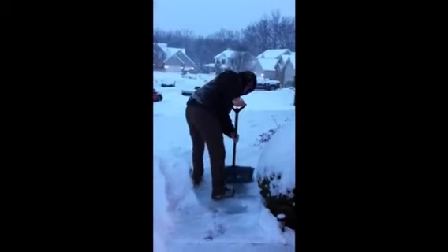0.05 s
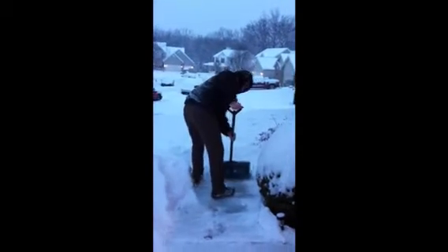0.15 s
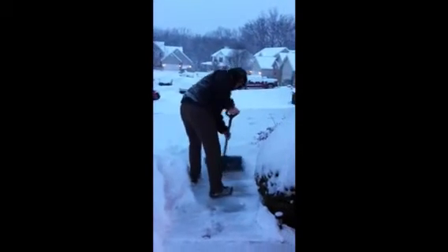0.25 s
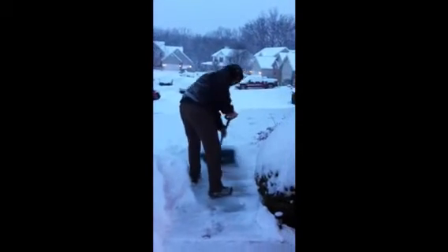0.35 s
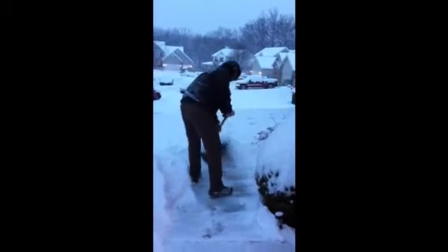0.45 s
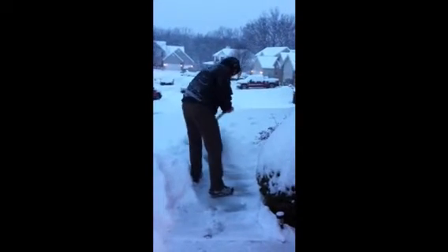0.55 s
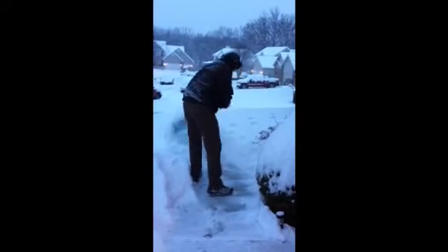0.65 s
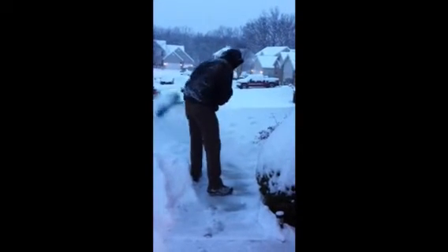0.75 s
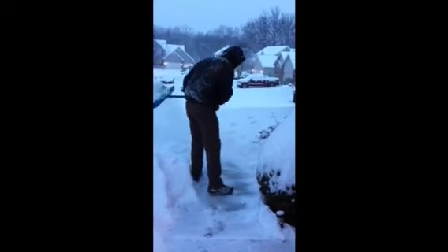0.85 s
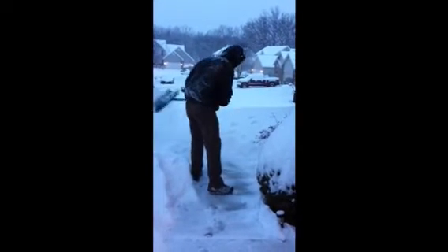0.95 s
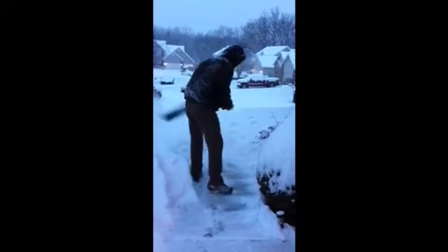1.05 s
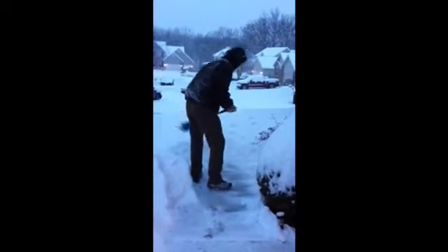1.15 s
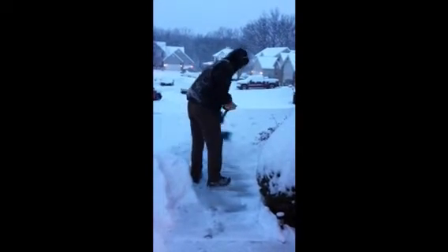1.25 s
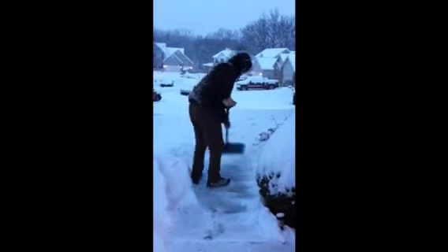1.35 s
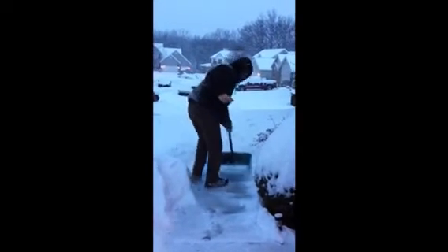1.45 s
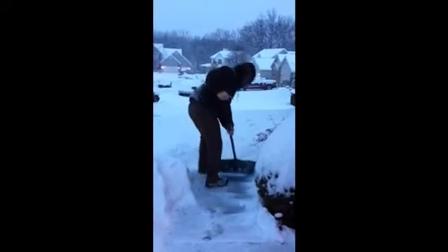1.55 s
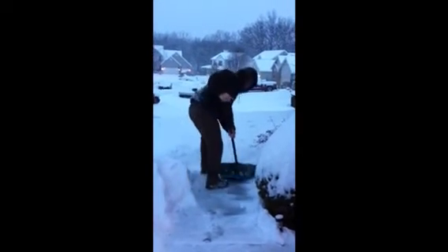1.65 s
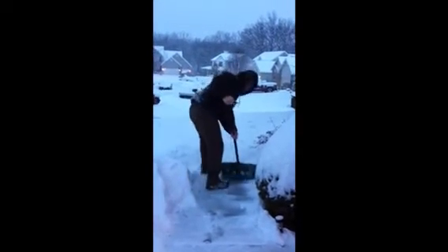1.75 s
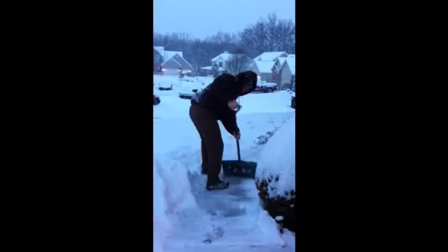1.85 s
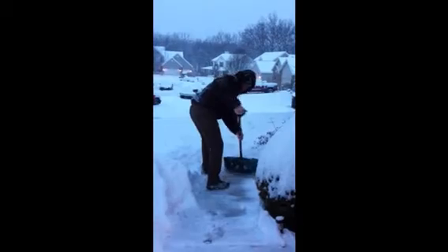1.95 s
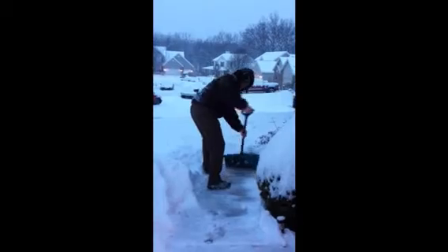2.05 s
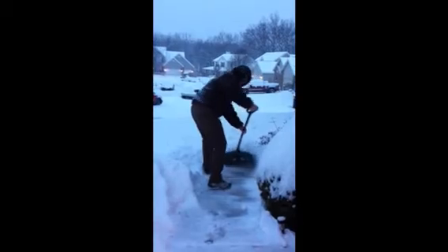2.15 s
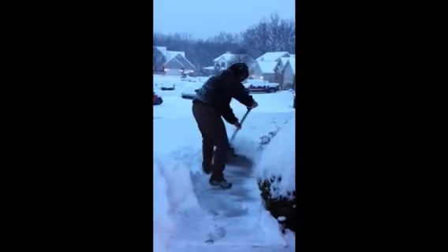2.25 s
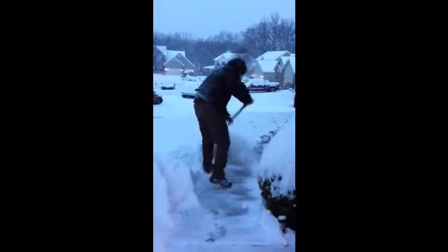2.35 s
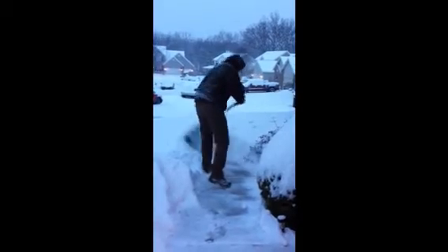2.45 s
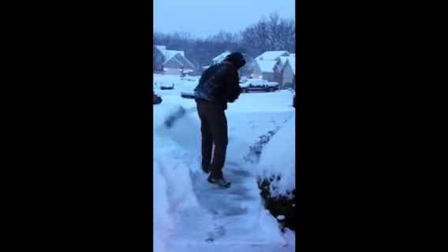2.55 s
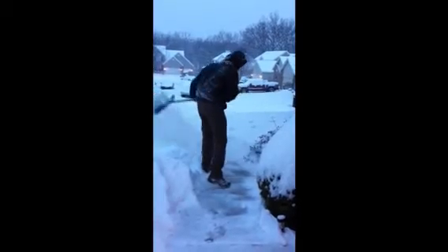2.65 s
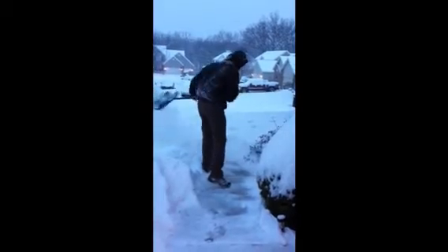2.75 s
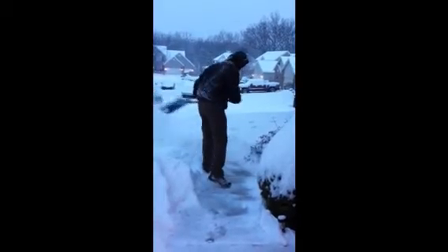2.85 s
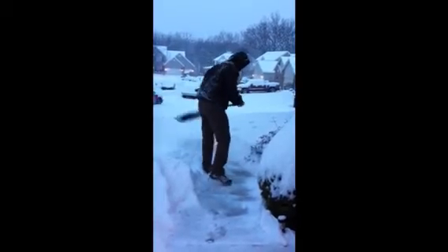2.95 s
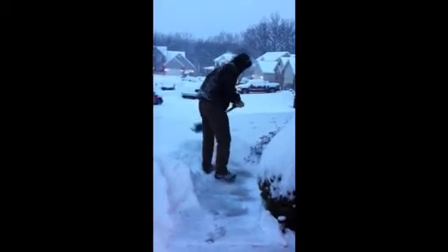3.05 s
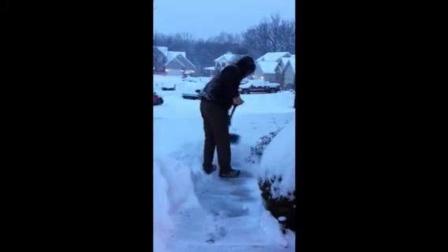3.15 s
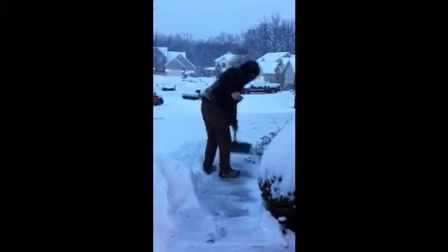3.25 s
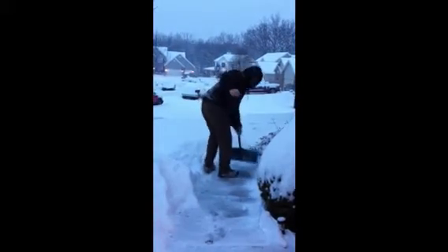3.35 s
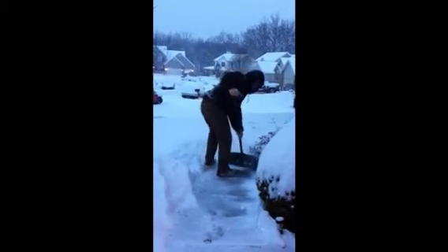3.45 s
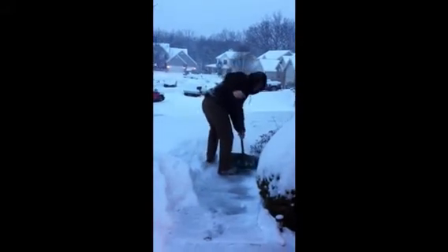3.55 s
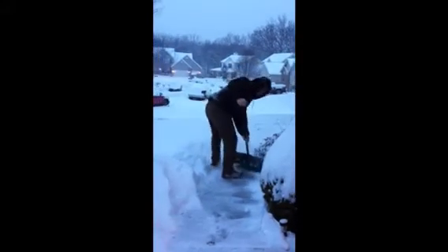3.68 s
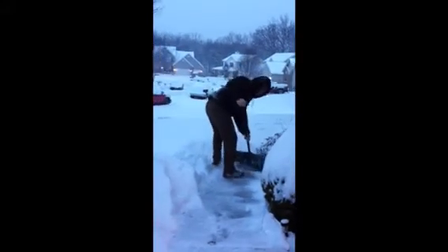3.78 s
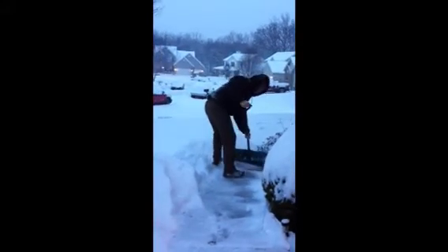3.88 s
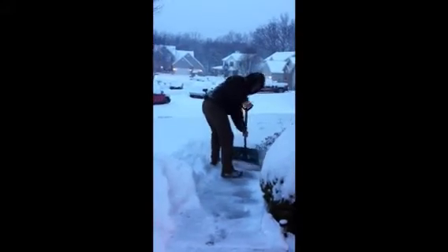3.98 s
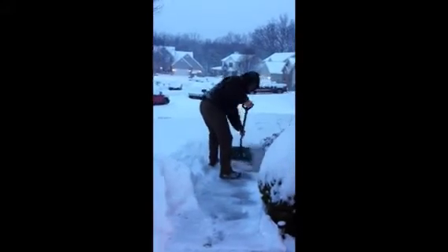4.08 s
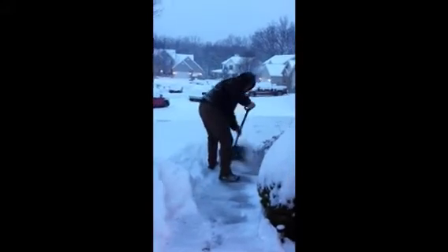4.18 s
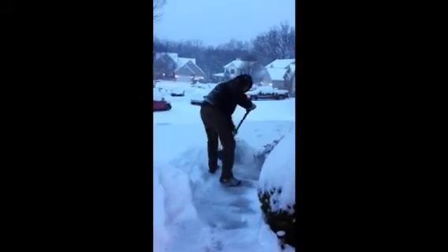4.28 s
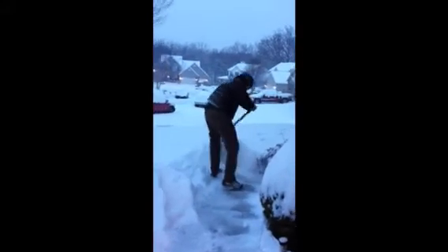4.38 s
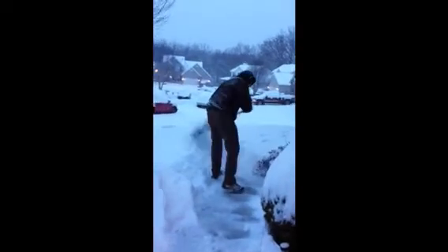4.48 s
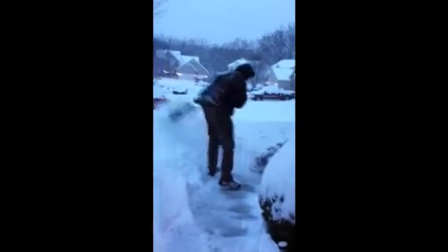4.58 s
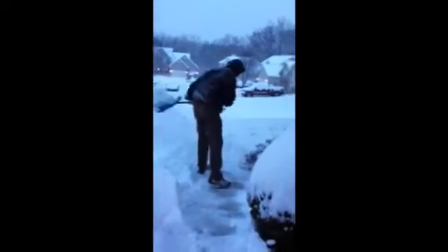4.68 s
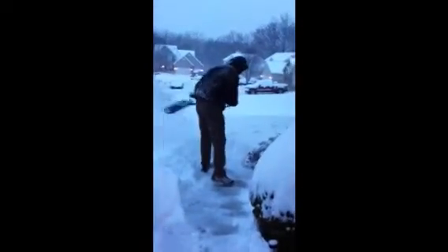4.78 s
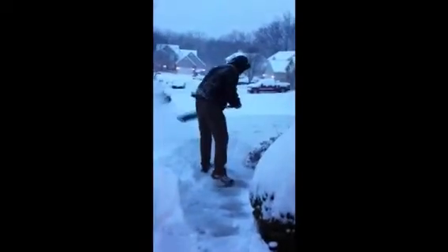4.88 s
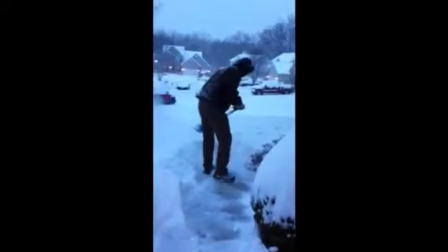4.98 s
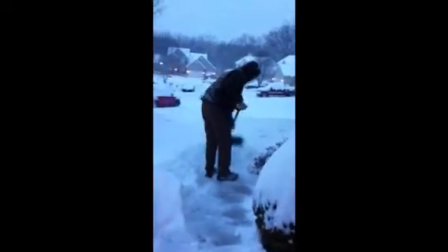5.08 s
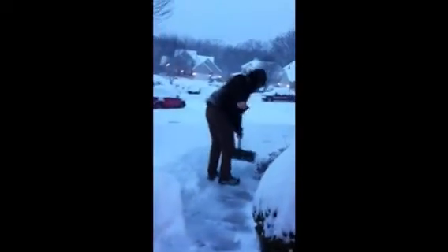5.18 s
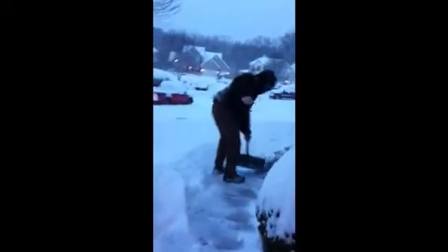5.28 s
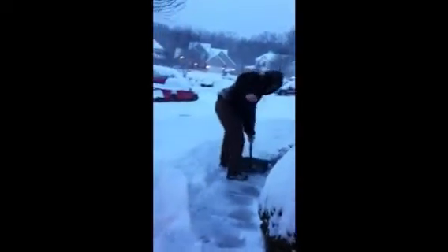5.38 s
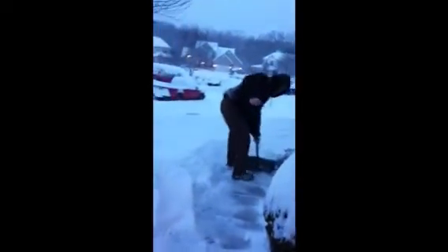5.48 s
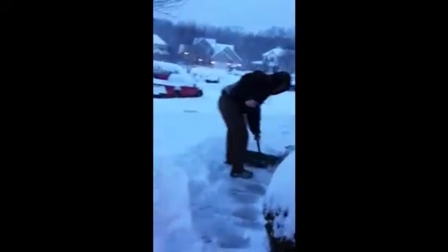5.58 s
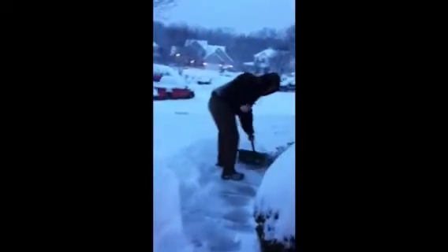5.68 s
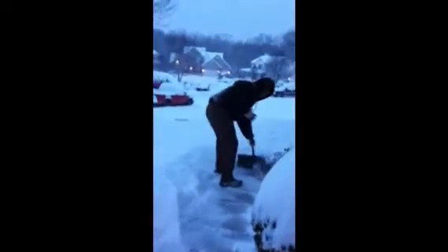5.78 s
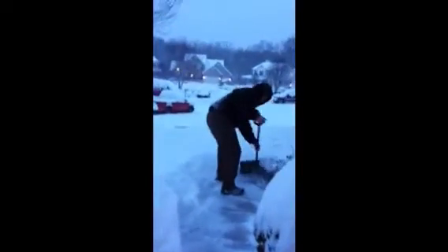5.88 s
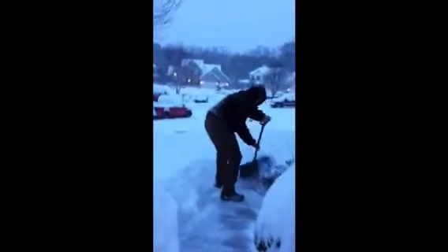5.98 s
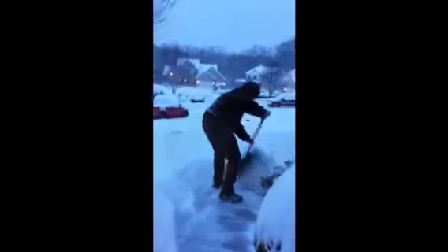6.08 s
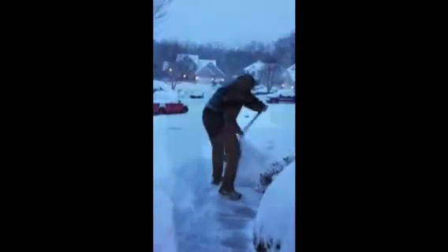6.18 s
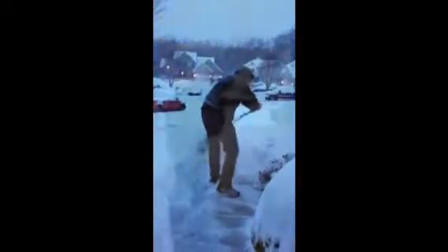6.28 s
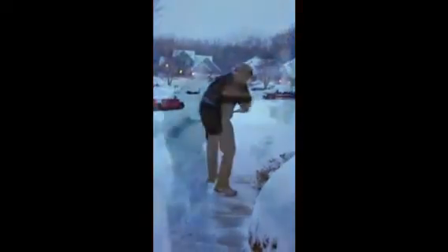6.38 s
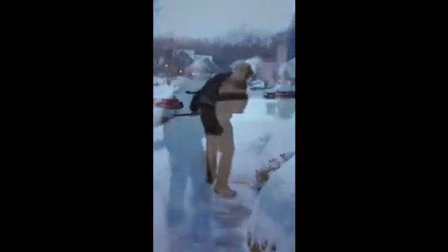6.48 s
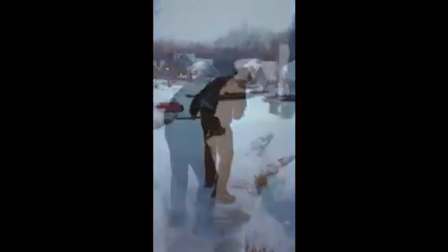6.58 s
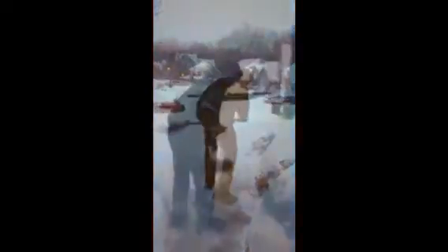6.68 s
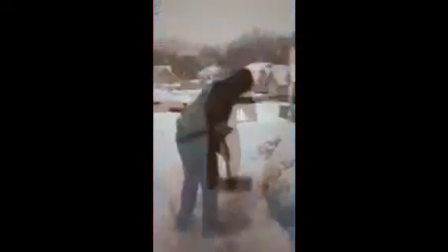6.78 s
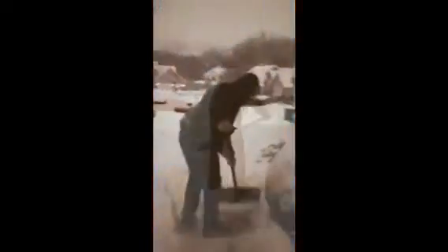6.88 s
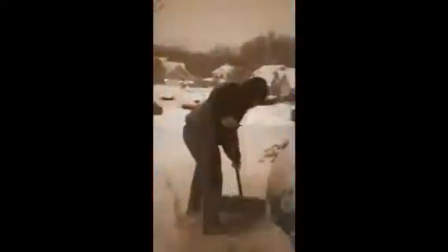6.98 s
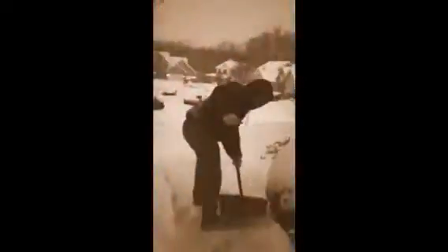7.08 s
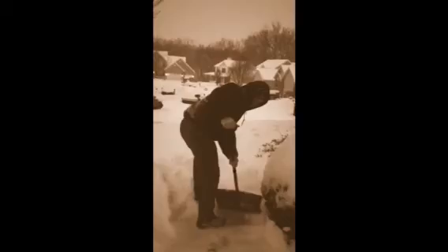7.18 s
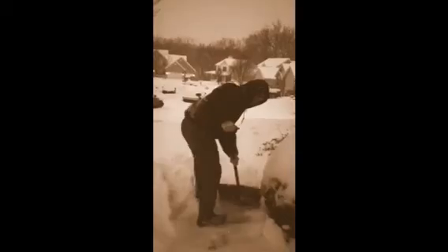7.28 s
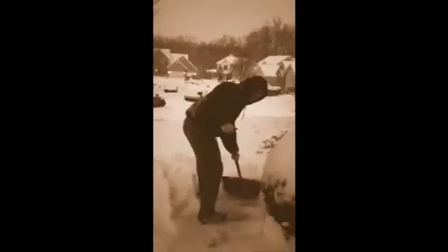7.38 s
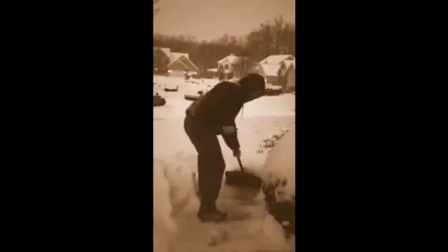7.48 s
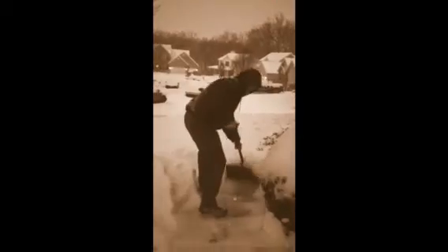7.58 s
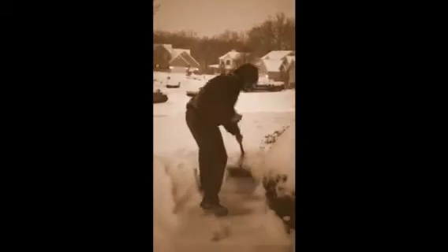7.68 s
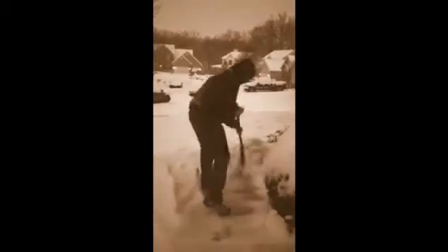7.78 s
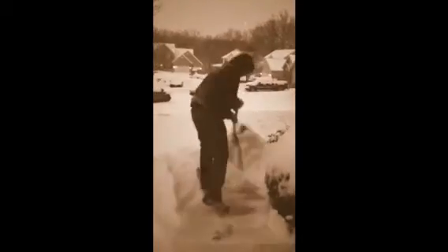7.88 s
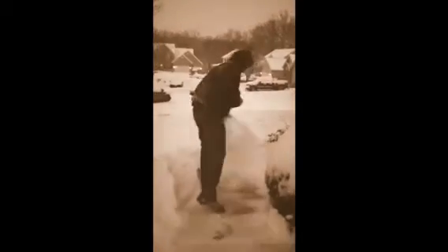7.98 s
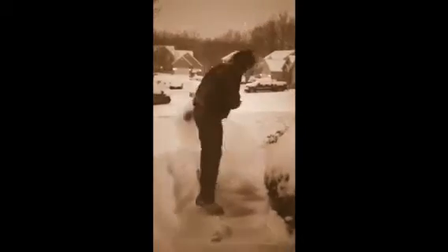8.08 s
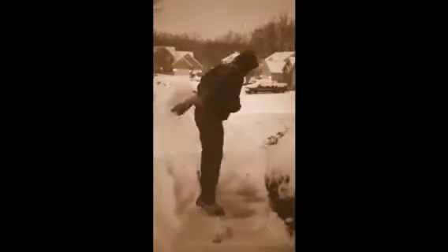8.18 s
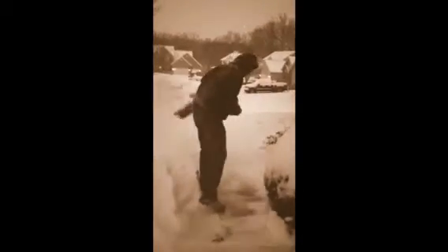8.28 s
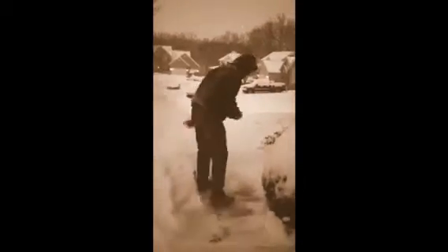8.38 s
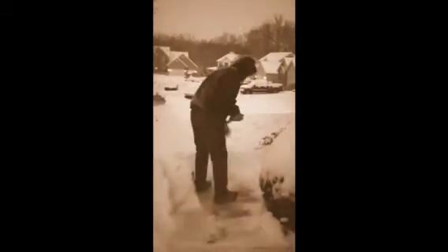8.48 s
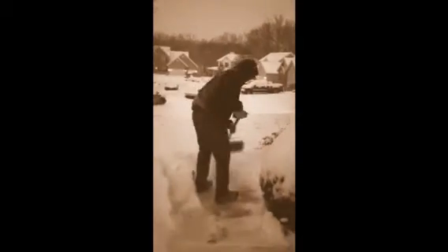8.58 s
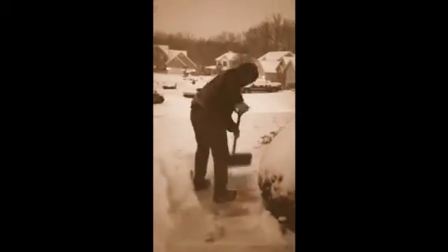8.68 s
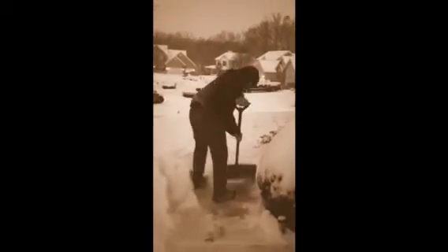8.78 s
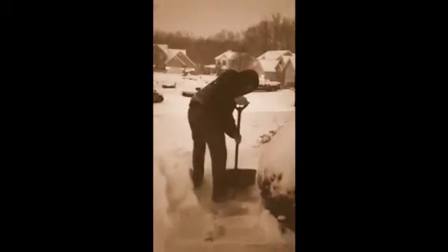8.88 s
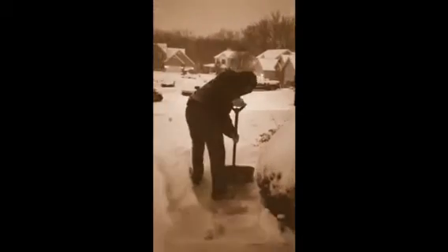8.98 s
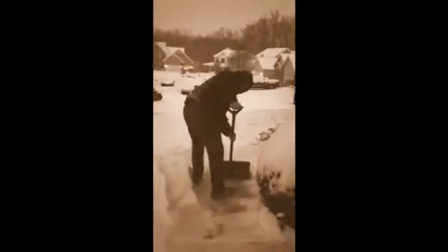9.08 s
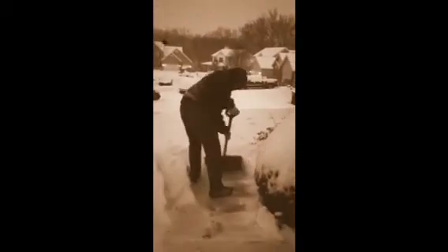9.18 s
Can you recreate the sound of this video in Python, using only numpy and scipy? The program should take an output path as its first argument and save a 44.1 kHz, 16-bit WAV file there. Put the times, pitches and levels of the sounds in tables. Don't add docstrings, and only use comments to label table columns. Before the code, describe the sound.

A few steps away, a plastic snow shovel thumps onto a concrete walk and grinds forward in a rough, bright scrape lasting under half a second. Further strokes follow about every two seconds, with stony cracks and hollow scoop knocks. Between them come light handle taps, faint sleeve swishes and soft patters of thrown snow. Quiet outdoor air, distant traffic hum and smooth microphone hiss continue throughout.

```python
import sys
import numpy as np
from scipy import signal
from scipy.fft import rfft, irfft, next_fast_len
from scipy.io import wavfile
from scipy.ndimage import uniform_filter1d, map_coordinates

SR = 44100
rng = np.random.default_rng(int(sys.argv[2]) if len(sys.argv) > 2 else 0)


def generate_wav(signal):
    frames = np.transpose(np.atleast_2d(signal))
    scaled = np.clip(frames, -1, 1) * 32767
    pcm = np.round(scaled).astype(np.int16)
    wavfile.write(sys.argv[1], SR, pcm)


def ratio_of_db(decibels):
    return 10 ** (np.asarray(decibels, float) / 20)


N = 407484


def unit(x):
    return x / np.sqrt(np.mean(x ** 2) + 1e-20)


def curves(rows):
    s, *cols = np.transpose(rows)
    return [np.interp(np.arange(N) / SR, s, c) for c in cols]


def wobble(rate):
    points = rng.standard_normal(int(N * rate / SR) + 4)
    return map_coordinates(points, [np.arange(N) * rate / SR])


def filtered(x, response):
    m = next_fast_len(N + SR // 2)
    return irfft(rfft(x, m) * response(np.fft.rfftfreq(m, 1 / SR)), m)[:N]


def ring(x, modes):
    def response(f):
        h = 0
        for k, (centre, width, db) in enumerate(modes):
            h = h + (-1) ** k * ratio_of_db(db) * 1j * f * width / (centre * centre - f * f + 1j * f * width)
        return h / np.sqrt(np.mean(abs(h) ** 2))
    return filtered(x, response)


def rush(spectrum):
    f, db = np.transpose(spectrum)

    def colour(hz):
        return ratio_of_db(np.interp(np.log(hz + 1), np.log(f + 1), db))
    return unit(filtered(rng.standard_normal(N), colour))


def add(track, s, sound):
    part = track[round(s * SR):][:len(sound)]
    part += sound[:len(part)]


def smooth_field(shape, wide, long):
    field = uniform_filter1d(rng.standard_normal(shape), size=wide, axis=0)
    return uniform_filter1d(field, size=long, axis=1)


def patchy(x, depth_db, wide, long):
    z = signal.stft(x, nperseg=256)[2]
    gain = ratio_of_db(depth_db * unit(smooth_field(z.shape, wide, long)))
    return signal.istft(z * unit(gain), nperseg=256)[1][:N]


def streaks(table, size):
    out = np.zeros(N)
    for s, length, from_hz, to_hz, db in table:
        u = np.linspace(0, 1, round(length * SR))
        fuzz = unit(uniform_filter1d(rng.standard_normal((2, SR // 5)), size=size)[:, :len(u)])
        level = ratio_of_db(db + 2.5 * fuzz[0]) * np.sin(np.pi * u)
        turns = np.cumsum(from_hz + (to_hz - from_hz) * u) / SR
        add(out, s, level * np.sin(2 * np.pi * turns + 1.38 * fuzz[1]))
    return out


def shovel():
    # start in seconds,
    # length in seconds, edge hiss in dB, change over the slide in dB, load in dB.
    strokes = [(.148, 0.024, -41.5, -1.5, 5), (.169, 0.061, -36, 2, 2), (.234, 0.055, -27.5, -8, 2),
               (.291, 0.12, -32.5, -28.5, -1), (.412, 0.025, -39, -19, 6), (.439, .12, -55, -19, 4.5),
               (1.733, 0.06, -59, 10, 0), (1.812, 0.046, -36.5, -2.5, 6.5), (1.862, 0.068, -40.5, 0, 2.5),
               (1.903, 0.041, -32.5, 0.5, 2.5), (1.944, 0.057, -31, 3, -3), (2.003, 0.16, -27.5, -29, -0.5),
               (2.172, 0.11, -43.5, -38, 3), (2.355, 0.059, -62.5, -11, 8), (3.672, 0.11, -39, 1, 2),
               (3.784, 0.068, -36, -31.5, 2), (3.859, 0.039, -46.5, 3, -1), (3.893, .254, -38, -4, -4),
               (4.147, 0.17, -41, -25.5, -2.5), (5.6, 0.048, -33, -6.5, -1), (5.652, 0.16, -41, -15, 0.5),
               (5.81, 0.12, -55, -21, -4), (7.221, 0.092, -35.5, -4.5, 3.5), (7.32, 0.1, -32.5, -5.5, 5.5),
               (7.432, 0.19, -48, -8.5, 2.5)]
    # start in seconds, length in seconds,
    # edge hiss in dB, change over the slide in dB, load in dB.
    brushes = [(.108, 0.021, -61, 3, 4), (7.212, 0.0069, -49, 3, 6), (1.365, 0.048, -64, -1, 3),
               (2.288, 0.066, -54, -5.5, -5.5), (5.08, 0.11, -54, -12, 2.5), (5.19, 0.085, -60, -6.5, -2.5),
               (5.36, 0.094, -63, 8, -8), (5.45, 0.11, -67.5, 2, -7), (6.385, 0.058, -64.5, 2.5, 0),
               (6.79, 0.1, -56, -11.5, -4), (7.16, 0.057, -52.5, -23, 4), (7.595, 0.036, -60.5, -6, 14),
               (7.63, .11, -65.5, -8, 8), (7.745, 0.045, -55.5, 0, 10.5), (8.54, 0.043, -61.5, 3.5, -2)]
    # time in seconds, ribs over face in dB, spray in dB, drum in dB.
    angle = [(.2, 0.5, -1, 0.5), (.3, -2, -2, 3.5), (.45, -2.5, -4, 0), (1.75, -8.5, 3, 10.5),
             (1.88, 1, 1.5, 4), (2.0, 0, -3.5, -3), (2.18, -3.5, -3.5, 2.5), (2.33, -4.5, 1.5, -3),
             (3.68, 2, 1.5, 2.5), (3.8, -2.5, 6.5, -1), (4.08, -0.5, -8.5, -5), (4.25, -2.5, 4, -0.5),
             (5.1, -0.5, -6, 7), (5.4, 1, 1.5, -12), (5.62, 3.5, -2, -3.5), (5.72, -0.5, 1.5, 1),
             (7.25, 3, 1, 4), (7.35, 3, -2.5, 1.5), (7.6, -6.5, -6, -9), (7.77, 2.5, -1, -2)]
    # pitch in Hz, width in Hz, level in dB.
    edge_modes = [(3320, 980, -3), (4340, 700, 3.5), (5740, 1400, 3.5), (7500, 2540, -0.5)]
    # pitch in Hz, width in Hz, level in dB.
    spray_modes = [(9520, 1740, -1), (10900, 710, 2.5), (12660, 2060, -1.5)]
    # pitch in Hz, width in Hz, level in dB.
    panel_modes = [(631, 158, -0.5), (893, 130, 0.5), (1323, 293, -1.5)]
    # pitch in Hz, width in Hz, level in dB.
    rib_modes = [(1550, 76, -17), (1968, 290, 2.5), (2670, 436, -1)]
    # pitch in Hz, width in Hz, level in dB.
    scoop_modes = [(203.6, 87, 0.5), (300.4, 87, 0), (374, 56, -3), (530, 133, -3)]

    angle_db, dry_db, drum_db = curves(angle)
    push = slides(strokes, rise_s=0.0029, panel_db=0, scoop_db=0)
    push += slides(brushes, rise_s=0.014, panel_db=3.5, scoop_db=-8.5)
    push[1] *= ratio_of_db(dry_db)
    push[3] *= ratio_of_db(drum_db)

    shared = grit(1200, spread_db=0.5, lumpy_db=1.5)
    shares, rates = (0.71, 0.69, 0.83, 0.32), (1500, 2500, 652, 148.2)
    edge, spray, panel, scoop = [p * unit(share * shared + grit(rate, spread_db=3.5, lumpy_db=1.44))
                                 for p, share, rate in zip(push, shares, rates)]
    jolts(edge, spray, panel)

    face = ring(panel * ratio_of_db(-4 - angle_db / 2), panel_modes)
    ribs = ring(panel * ratio_of_db(-4.5 + angle_db / 2), rib_modes)
    bright = patchy(ring(edge, edge_modes) + ring(spray, spray_modes), depth_db=1.5, wide=3, long=8)
    body = patchy(face + ribs, depth_db=1.87, wide=2, long=12)
    return bright + body + ring(scoop, scoop_modes) + singing() + pebbles()


def slides(rows, rise_s, panel_db, scoop_db):
    lift_s = 0.03
    # dB at no load, dB per dB of load
    laws = [(0, 0), (0, -0.3), (1.4 + panel_db, 0.66), (-0.94 + scoop_db, 0.33)]
    push = np.zeros((4, N))
    for s, length, db, change_db, load_db in rows:
        t = np.arange(round((length + lift_s) * SR)) / SR
        slope_db = change_db * np.minimum(t / length, 1)
        fade_db = 60 * np.maximum(t - length, 0) / lift_s
        shape = ratio_of_db(db + slope_db - fade_db) * np.minimum(t / rise_s, 1)
        for track, (base_db, per_load) in zip(push, laws):
            add(track, s, ratio_of_db(2 * (base_db + per_load * load_db)) * shape ** 2)
    return np.sqrt(push)


def grit(rate, spread_db, lumpy_db):
    size = ratio_of_db(spread_db * np.minimum(rng.exponential(size=N), 3.5))
    hits = (rng.random(N) < rate / SR) * size * rng.standard_normal(N)
    return unit((rng.standard_normal(N) + 0.89 * unit(hits)) * ratio_of_db(lumpy_db * wobble(70)))


def jolts(edge, spray, panel):
    # time in seconds, crack peak in dB.
    catches = [(0.1491, -27.5), (.2945, -13), (.1695, -7.5), (0.197, -15), (0.2442, -11), (.304, -8),
               (1.7742, -21), (1.8377, -11), (1.854, -5), (1.9068, -27), (1.928, -15), (1.9845, -6),
               (1.9988, -5), (2.042, -19), (2.0626, -33), (2.173, -21.5), (2.299, -37), (2.347, -30),
               (3.6749, -18), (3.6928, -5), (3.744, -12), (3.7885, -8.5), (3.794, -10.5), (3.8885, -18),
               (4.1223, -20), (5.6022, -28.5), (5.6246, -19), (7.2333, -5.5), (7.3517, -24), (7.6046, -42),
               (7.7557, -25.5)]
    # time in seconds, crack peak in dB,
    # panel against the crack in dB.
    slaps = [(0.2338, -12, 1), (0.2718, -16, -5), (0.2964, -10.5, -4), (.415, -30, 4), (1.7375, -24.5, 6),
             (2.1725, -31.5, 7.5), (5.082, -50, 4), (2.0161, -11, -1.5), (2.1042, -26, 2),
             (2.3335, -31.5, -3.5), (3.954, -25.5, 0.5), (4.046, -24.5, -2), (4.0825, -32.5, 10),
             (4.1744, -23.5, -2), (4.2334, -27.5, -6.5), (5.689, -28, 3), (5.7308, -21.5, -4),
             (7.3232, -31, 1), (7.339, -23, 6), (7.6015, -40, 13), (7.607, -36, 6), (3.8595, -37, 2),
             (7.7905, -40, 4), (7.407, -27, 5), (7.42, -27, 9.5), (1.815, -21, 5.5), (2.197, -39, 7.5)]
    events = [(*c, -14) for c in catches] + list(slaps)
    t = np.arange(SR // 10) / SR
    crack = (ratio_of_db(-60 * t / 0.0043) + 0.36 * ratio_of_db(-60 * t / 0.041)) * (1 - np.exp(-t / 0.0006))
    shove = ratio_of_db(-60 * t / 0.031) * (1 - np.exp(-t / 0.00032))
    noises = np.clip(rng.standard_normal((len(events), 2, len(t))), -1.6, 1.6)
    for (s, db, panel_db), noise in zip(events, noises):
        noise[0, 12] = 4.9
        add(edge, s, ratio_of_db(db - 12.5) * crack * noise[0])
        add(spray, s, ratio_of_db(db - 8) * crack * noise[0])
        add(panel, s, ratio_of_db(db + panel_db - 4.5) * shove * noise[1])


def singing():
    # start in seconds, length in seconds, from Hz, to Hz, level in dB.
    edge_songs = [(1.985, 0.053, 1230, 1300, -26.5), (2.03, 0.116, 5800, 6500, -41),
                  (4.015, 0.044, 1950, 1850, -35.5), (4.07, .085, 1880, 1800, -39.5),
                  (7.32, 0.053, 4500, 4550, -31.5), (7.4, 0.0373, 1600, 1200, -30.5),
                  (7.32, 0.0275, 2300, 1890, -34), (4.12, 0.0454, 1600, 2600, -46),
                  (5.085, 0.051, 1300, 1350, -59), (5.6, .045, 6300, 6000, -33),
                  (7.75, 0.034, 1700, 2100, -47), (3.89, 0.028, 3900, 4900, -48),
                  (4.02, .08, 3600, 2640, -60), (4.15, 0.049, 2450, 2350, -38.5)]
    # start in seconds, length in seconds, from Hz, to Hz, level in dB.
    scoop_hums = [(3.92, .17, 249.5, 282.4, -38), (1.9, 0.14, 216, 240, -48),
                  (3.86, 0.1, 1147, 1160, -44.5), (3.91, 0.046, 973, 950, -43),
                  (4.03, 0.032, 782, 817, -40), (4.17, 0.048, 866, 836, -46)]
    return streaks(edge_songs, size=170) + streaks(scoop_hums, size=1100)


def pebbles():
    # time in seconds, peak in dB, pitch in Hz.
    snaps = [(0.1708, -8.5, 7800), (0.1811, -21, 5900), (0.1983, -19, 7100), (0.245, -12, 6650),
             (0.252, -10, 5300), (0.2721, -15, 7300), (0.417, -31, 2800), (1.7388, -27, 2230),
             (1.7756, -25, 8900), (1.7788, -29, 8500), (1.8275, -17, 2690), (1.8416, -24, 8200),
             (1.8556, -12, 7500), (1.8764, -25, 7900), (1.8874, -25, 9300), (1.8971, -24, 9200),
             (1.909, -18, 9700), (1.9286, -10, 6900), (1.948, -14, 5000), (1.965, -10.5, 4000),
             (2.0154, -15, 8250), (2.0435, -15, 5500), (2.064, -23, 5700), (2.1051, -21, 5300),
             (2.1743, -27, 6200), (2.3017, -31, 5300), (2.3379, -34, 5700), (2.3488, -26, 11700),
             (3.6952, -14, 5900), (3.7461, -20, 7200), (3.7749, -15, 9200), (3.8612, -28, 5400),
             (3.908, -16, 8800), (3.9268, -17, 9600), (3.9377, -22, 6900), (3.955, -22, 4900),
             (3.9997, -14, 6300), (4.0452, -22, 2700), (4.0839, -32, 2500), (4.124, -25, 11100),
             (4.2154, -41, 9600), (7.2236, -25, 5900), (7.2342, -12, 4800), (7.2689, -18, 2900),
             (7.2985, -25, 4300), (7.3389, -16, 2500), (7.354, -16, 3900), (7.375, -23, 4000),
             (7.4075, -26, 2720), (7.4302, -22, 3830), (7.5903, -34, 2200), (7.605, -30.5, 2090),
             (7.6076, -36, 3000), (7.7573, -40, 3460), (7.7762, -28.5, 2400), (7.7904, -34, 2100)]
    cycles, tail, tail_t60_s = 1.26, .35, .005
    out, t = np.zeros(N), np.arange(SR // 200) / SR
    lean = np.exp(-t / .0004)
    lean /= lean.sum()
    for s, db, hz in snaps:
        click = np.exp(-t * hz / cycles) * np.sin(2 * np.pi * hz * t)
        click -= click.sum() * lean
        chip = tail * ratio_of_db(-60 * t / tail_t60_s) * rng.standard_normal(len(t))
        add(out, s, ratio_of_db(db + 0.6) * rng.choice([-1, 1]) * (click + chip))
    return out


def knocks():
    # time in seconds, peak in dB, pitch in Hz,
    # time to fall 60 dB in seconds.
    thuds = [(0.0741, -19.5, 247, 0.061), (0.117, -25, 360, 0.15), (0.297, -13, 252, 0.076),
             (0.312, -18, 237, 0.11), (0.556, -51, 530, 0.18), (1.16, -40.5, 553, 0.13),
             (1.737, -20, 268, 0.17), (1.738, -26, 402, .06), (1.819, -26, 250.5, 0.074),
             (3.043, -51, 600, 0.11), (3.674, -12.5, 421, 0.073), (5.603, -28, 286, 0.057),
             (7.128, -11.5, 281, 0.053), (7.223, -16.5, 530, 0.13), (7.609, -35, 300, 0.057),
             (8.559, -45, 199, 0.18)]
    # time in seconds, peak in dB, dullness from 0 to 1.
    taps = [(0.1218, -25, 0.6), (0.559, -39.5, 0.7), (1.1617, -28.5, 0.7), (1.1738, -29, 0.2),
            (2.667, -56, 0.5), (3.0442, -37, 1), (3.288, -44.5, 0.3), (6.173, -44, 0.2), (6.324, -47, 0.5),
            (6.422, -56, 0.2), (6.817, -48, 0.2), (7.1273, -34, 0.8), (7.166, -33.5, 0.4)]
    # pitch in Hz, level in dB, decay time in seconds (a tone falls 60 dB in 0.27
    handle = [(720, 2, 0.05), (927, -4, 0.14), (1100, -7, 0.11), (1190, -3, 0.23), (1330, -6.5, 0.082),
              (1700, -10, 0.08), (1980, 3, 0.089)]
    out, t = np.zeros(N), np.arange(SR // 3) / SR

    def sine(hz):
        return np.sin(2 * np.pi * hz * t)

    for s, db, hz, t60 in thuds:
        tone = sine(hz) + 0.56 * sine(0.77 * hz) + 0.35 * sine(1.3 * hz)
        tone += 0.47 * sine(1.8 * hz) * ratio_of_db(-60 * t / 0.08)
        add(out, s, ratio_of_db(db - 8.5 - 60 * t / t60) * tone * (1 - np.exp(-t / 0.0022)))

    scatters = rng.normal(0, 3.6, (len(taps), len(handle)))
    for (s, db, dull), scatter in zip(taps, scatters):
        tone = np.zeros(len(t))
        for (hz, level, t60), d in zip(handle, scatter):
            tone += ratio_of_db(level + d - 22 * dull * np.log2(hz / 800) - 60 * t / (0.27 * t60)) * sine(hz)
        tick = uniform_filter1d(rng.standard_normal(len(t)), size=11)
        tone += 1.3 * tick * ratio_of_db(-12 * dull - 60 * t / 0.05)
        snap = 2.0 * ratio_of_db(-60 * t / 0.021)
        add(out, s, ratio_of_db(db - 11.5) * tone * (1 + snap) * (1 - np.exp(-t / 0.00067)))
    add(out, .0063, -ratio_of_db(-9.5) * out.copy())
    return out


def jacket():
    # start in seconds, length in seconds, from Hz, to Hz, level in dB.
    swishes = [(1.007, 0.058, 5800, 8050, -60), (1.055, .035, 5500, 8040, -66),
               (2.493, 0.066, 5550, 7700, -60.5), (2.87, 0.058, 5400, 8500, -60),
               (3.46, .06, 6240, 7500, -66), (3.565, 0.046, 4170, 3770, -60.5),
               (8.09, 0.06, 7500, 7830, -58)]
    return streaks(swishes, size=40)


def yard(x):
    t = np.arange(SR // 3) / SR
    tail = rng.standard_normal(len(t)) * ratio_of_db(-60 * t / 0.46) * (t > .006)
    echo = signal.fftconvolve(x, tail / np.linalg.norm(tail))[:N]
    return filtered(echo, lambda hz: 1 / (1 + 1j * hz / 5000))


def air():
    # time in seconds, level in dB.
    drift = [(0, -65.5), (.06, -58.5), (.6, -65.5), (1.1, -64), (1.4, -64.5), (1.7, -63), (2.6, -64),
             (3.2, -64), (3.5, -62.5), (4.5, -63.5), (5, -63.5), (5.97, -61), (6.1, -63.5), (6.25, -60.5),
             (7.1, -60), (8, -62.5), (8.65, -64.5), (8.92, -62)]
    # middle in seconds, half length in seconds, level in dB.
    landings = [(0.106, 0.043, -62), (1.1, .2, -66), (1.694, 0.65, -77), (4.558, 0.18, -70.5),
                (5.896, 0.18, -63.5), (6.608, 0.16, -61), (7.113, 0.32, -65), (7.965, 0.17, -65.5),
                (8.965, 0.058, -63.5)]
    # frequency in Hz, level in dB per Hz.
    traffic_colour = [(32, -57), (55, -28), (128, -5), (161, 1.5), (225, 2.5), (316, -0.5), (380, -3),
                      (413, -6), (533, -2.5), (640, -6.5), (1400, -13), (2300, -24), (3520, -120)]
    # frequency in Hz, level in dB per Hz.
    patter_colour = [(350, -51), (600, -4), (793, -7.5), (1010, -8.5), (1500, -6.5), (4200, -15.5),
                     (6000, -17), (7800, -27), (13200, -120)]
    # frequency in Hz, level in dB per Hz.
    hiss_colour = [(1470, -30), (2500, -5.5), (2850, -4.5), (3280, -4.5), (7130, -4.5), (8660, -3),
                   (11700, 0.5), (15200, -1.5), (16000, -11)]
    drift_db, = curves(drift)
    t = np.arange(N) / SR
    falling = ratio_of_db(-70.5)
    for s, half, db in landings:
        falling = falling + ratio_of_db(db) * np.exp(-((t - s) / half) ** 2)
    traffic_db = -62.0 + 0.92 * (drift_db - drift_db.mean()) + 0.78 * wobble(9.5)
    traffic = ratio_of_db(traffic_db) * rush(traffic_colour)
    patter = falling * ratio_of_db(0.73 * wobble(18)) * patchy(rush(patter_colour), depth_db=2.2, wide=3, long=12)
    hiss = ratio_of_db(drift_db + 0.071 * wobble(5.9)) * rush(hiss_colour)
    return traffic + patter + hiss


def scene():
    near = knocks() + shovel()
    near = filtered(near, lambda hz: (1j * hz / (110 + 1j * hz)) ** 2)
    add(near, 8.8754, near[:SR // 2].copy())
    return (near + ratio_of_db(-13.0) * yard(near) + jacket() + air())[None]


def band_limit(x):
    return signal.sosfilt(signal.butter(12, 16490, fs=SR, output="sos"), x)


def record(dry):
    shudder = filtered(abs(dry[0]) * wobble(55), lambda hz: (hz / 55) ** 2 / (1 + (hz / 65) ** 4))
    offset = -ratio_of_db(-74.5 + .7 * wobble(0.67))
    heard = filtered(dry[0], lambda hz: hz < 15950)
    return band_limit(heard + ratio_of_db(-15.5) * shudder + offset)


dry = scene()
out = record(dry)
generate_wav(out)
```